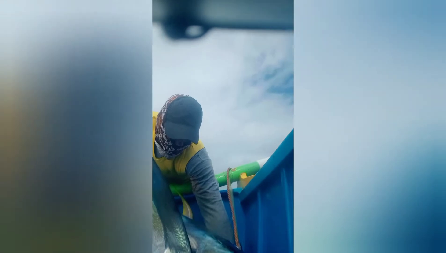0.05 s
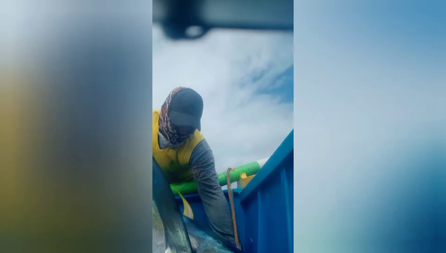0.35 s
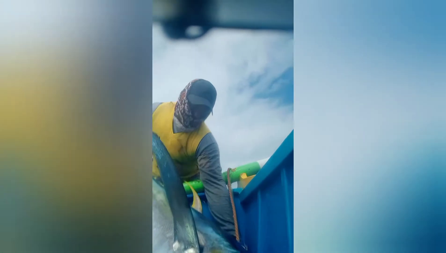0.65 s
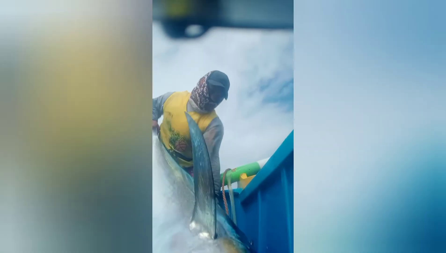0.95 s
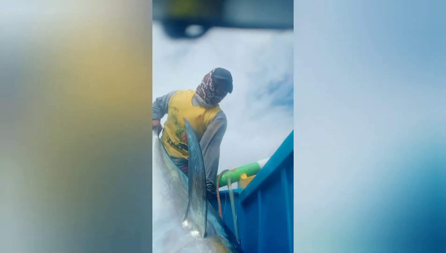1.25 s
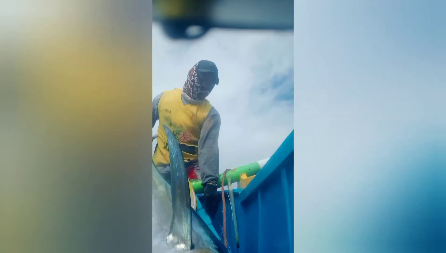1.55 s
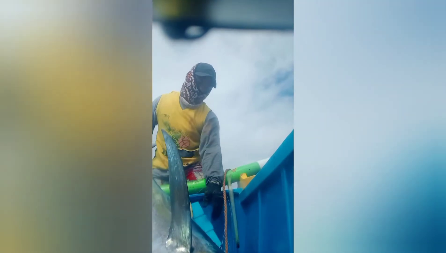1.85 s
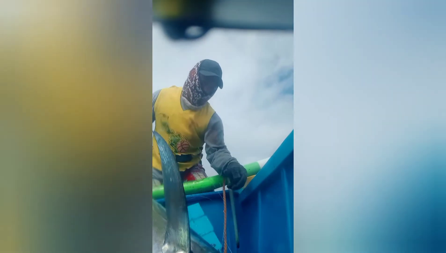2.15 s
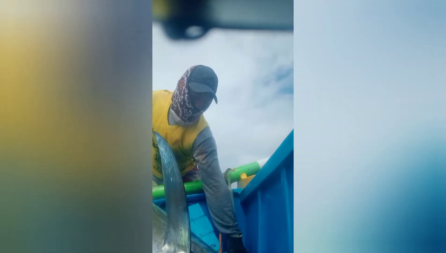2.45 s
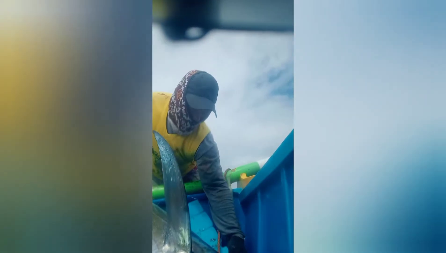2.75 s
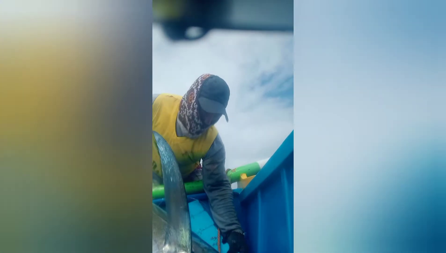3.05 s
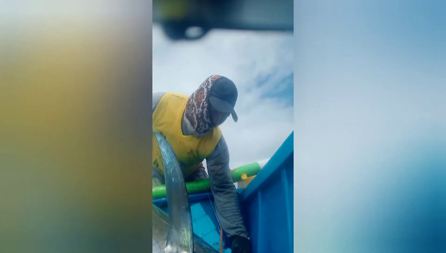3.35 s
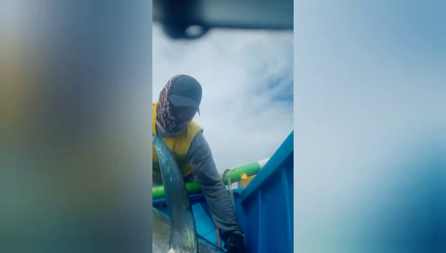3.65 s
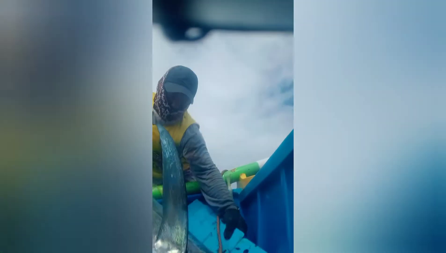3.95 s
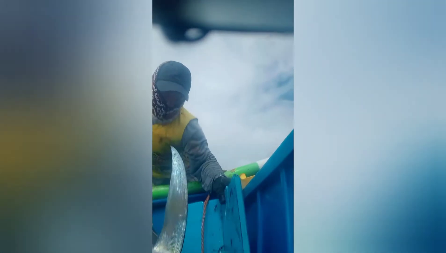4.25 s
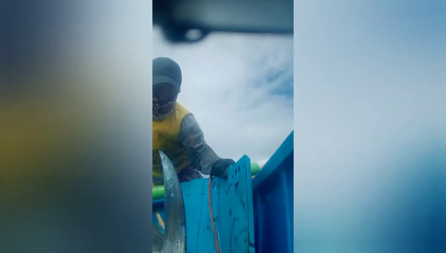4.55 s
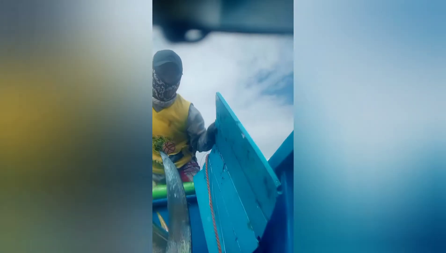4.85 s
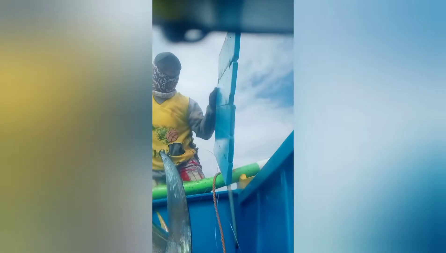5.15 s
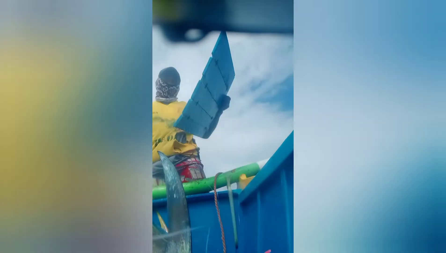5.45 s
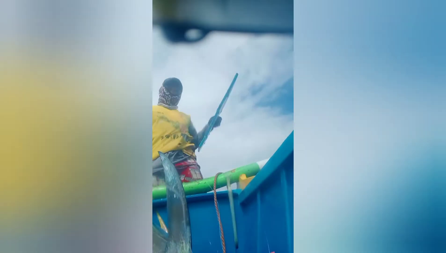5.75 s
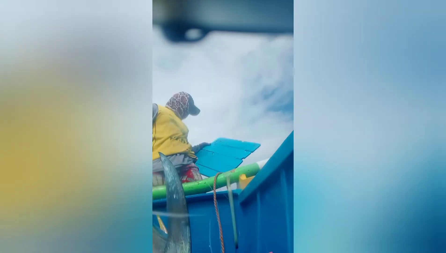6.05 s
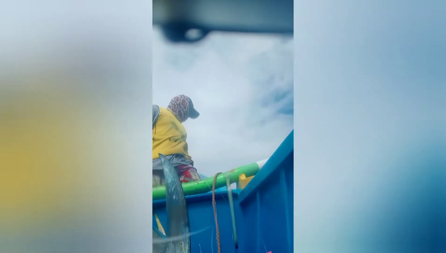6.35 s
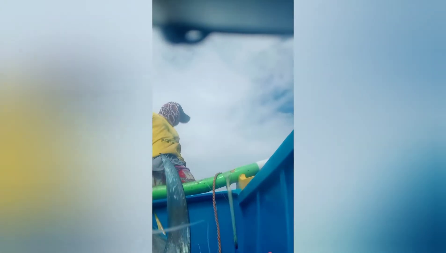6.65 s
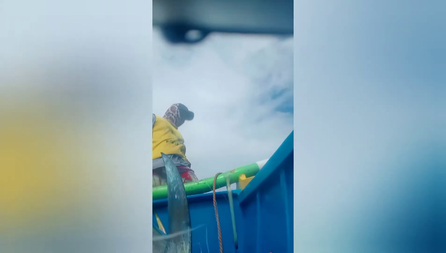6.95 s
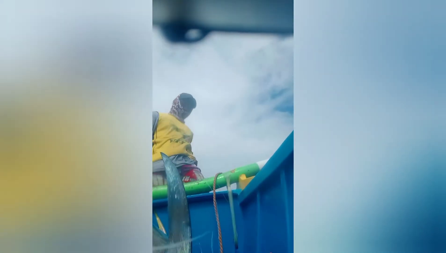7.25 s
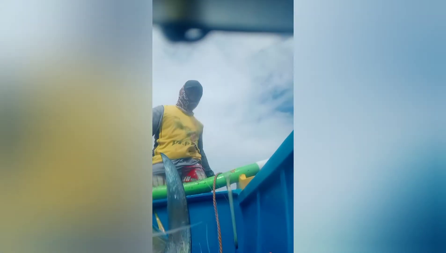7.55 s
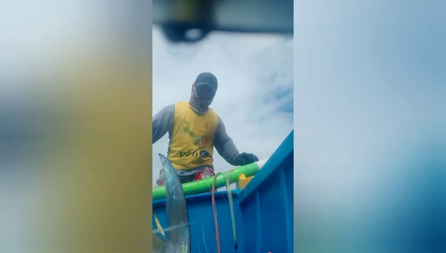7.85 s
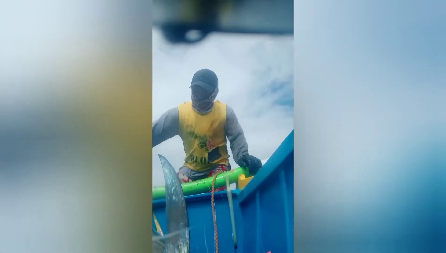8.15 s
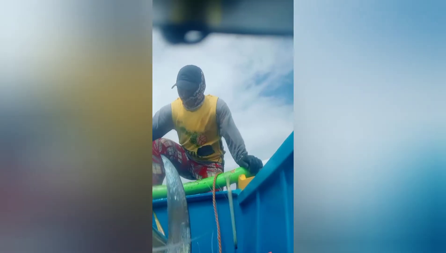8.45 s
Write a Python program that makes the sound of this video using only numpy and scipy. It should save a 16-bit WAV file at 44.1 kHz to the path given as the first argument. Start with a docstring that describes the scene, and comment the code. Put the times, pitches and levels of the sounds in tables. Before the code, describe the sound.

Close, dull thuds and wet slaps of a fish beating a boat hull, with wooden knocks, sloshing water and a dropped board.

```python
"""A big fish thrashes on the wet deck of a small boat, close to a camera microphone in a closed housing.
Its body and tail thump the hull, wet skin smacks, loose boards clack and a thin panel hums;
late on, a deck board drops and bounces. Underneath, water sloshes in surges, things scrape
over the deck, the hull rumbles and wind buffets the housing, which dulls the sound and rings faintly."""
import sys
import numpy as np
from scipy import signal
from scipy.fft import rfft, irfft
from scipy.io import wavfile
from scipy.ndimage import uniform_filter1d, minimum_filter1d

SR = 44100
rng = np.random.default_rng(int(sys.argv[2]) if len(sys.argv) > 2 else 0)


def inscribe(sig):
    """Save sig as 16-bit PCM at rate SR to the path in sys.argv[1].

    A 1-D sig is mono; a 2-D sig holds one channel per row.
    Samples are clipped to [-1, 1] before scaling.
    """
    pcm = np.round(np.clip(np.atleast_2d(sig).T, -1, 1) * 32767)
    wavfile.write(sys.argv[1], SR, pcm.astype(np.int16))


N = 374832
TIME = np.arange(N) / SR
AGE = np.arange(SR // 4) / SR  # seconds into one blow

# The fish hits the hull, close by. Each row: start in seconds, level in dB, centre of the tone in Hz,
# wet slap in dB relative to the blow.
FISH_THUMPS = [(0.523, -7.5, 342, -11.5), (0.634, -3, 146, -16.5), (0.725, -7.5, 136, -14.5),
               (0.863, -3.5, 264, -18), (0.92, -11.5, 334, -6), (1.017, -4, 157, -17),
               (1.096, -3.5, 153, -14.5), (1.261, -7, 229, -11), (1.296, -12.5, 260, -17),
               (1.454, -11, 150, -19), (2.068, -8.5, 193, -8.5), (2.126, -7.5, 190, -10.5),
               (2.455, -11.5, 147, -15), (2.752, -7.5, 290, -12), (2.778, -6.5, 101, -15),
               (2.81, -14, 140, -6.5), (3.195, -11, 300, -17), (3.742, -5, 127.5, -6.5),
               (3.8, -6.5, 133, -10.5), (3.832, -5, 140, -12.5), (4.047, -6.5, 160, -10),
               (4.131, 0.5, 179, -16.5), (4.153, -4, 195, -17), (4.194, -1, 174, -13.5),
               (4.249, 0.5, 231, -14), (4.331, -11, 170, -13), (4.562, -13, 223, -11.5),
               (4.733, -4, 145, -20.5), (6.217, -15, 226, -8)]
# Wet skin and boards smack. Each row: start in seconds, level in dB.
WET_SPLATS = [(0.523, -23), (0.595, -26.5), (0.714, -21.5), (0.911, -22.5), (0.964, -24.5), (1.037, -26),
              (4.048, -24), (4.153, -25.5), (5.075, -32.5), (5.581, -26.5), (6.082, -33), (7.635, -28),
              (8.343, -26.5)]
# Blows on a thin hollow panel. Each row: start in seconds, level in dB, centre of the tone in Hz.
PANEL_BLOWS = [(2.069, -7.5, 265), (2.126, -10.5, 265), (2.785, -13, 75)]
# Hard knocks on the deck boards. Each row: start in seconds, level in dB, centre of the tone in Hz.
DECK_KNOCKS = [(0.473, -11.5, 1010), (1.452, -12, 620), (1.885, -20, 1240), (1.909, -21.5, 1290),
               (1.974, -19, 1280), (2.021, -12, 720), (2.053, -13, 1100), (2.722, -21, 570),
               (2.944, -25.5, 500), (3.166, -17, 1150), (3.421, -16.5, 920), (3.445, -16.5, 1100),
               (3.476, -19.5, 1330), (3.489, -12.5, 1000), (3.542, -15.5, 1170), (3.551, -9, 880),
               (3.744, -12.5, 685), (3.8, -9.5, 660), (3.83, -13.5, 1200), (3.867, -12.5, 1560),
               (3.89, -9.5, 1460), (3.977, -24, 1510), (4.224, -17.5, 790), (4.903, -18, 1400),
               (4.918, -21, 1210), (4.983, -20, 1400), (4.998, -20, 1100), (5.145, -32, 1000),
               (6.245, -18, 830), (6.535, -14.5, 1100), (6.844, -19, 874), (6.955, -33.5, 1500),
               (7.622, -21, 710)]
# The loose board lands and bounces. Each row: start in seconds, level in dB, centre of the tone in Hz,
# slap in dB relative to the blow.
BOARD_LANDINGS = [(6.438, -4.5, 330, -11.5), (6.496, -9.5, 159, -7.5), (6.535, -3.5, 300, -8.5),
                  (6.626, -12.5, 141, -11.5), (6.655, -10, 346, -10.5), (6.842, -5.5, 345, -12.5)]
# Sharp snaps right by the housing. Each row: start in seconds, level in dB.
CLOSE_SNAPS = [(0.472, -10.5), (1.451, -23.5), (3.167, -24), (4.443, -25.5), (8.249, -36.5), (8.366, -25.5)]
# Water runs over the deck. Each row: crest in seconds, length in seconds, wash in dB, hull rumble in dB.
WATER_SURGES = [(0.293, 0.079, -29.5, -24.5), (0.556, 0.23, -32.5, -19.5), (0.9, 0.37, -28, -21),
                (1.53, 0.32, -31.5, -34), (2.791, 0.066, -28.5, -18), (3.96, 0.22, -31, -22),
                (4.55, 0.18, -30, -25.5), (5.61, 0.38, -37.5, -36), (6.25, 0.11, -31.5, -32.5),
                (7.74, 0.21, -33.5, -31), (8.04, 0.18, -37.5, -25.5), (8.336, 0.12, -41, -26.5)]
# The sea laps at the hull between surges. Each row: time in seconds, level in dB.
SEA_LAPPING = [(0, -37.5), (1.85, -40.5), (2.6, -45), (3.55, -36), (4.3, -50), (5.2, -41), (7.2, -45.5),
               (8.5, -34)]
# Things drag on the boards; gusts hit the housing. Each row: middle and length in seconds, level in dB.
DECK_SCRAPES = [(.28, .11, -34.5), (3.02, 0.034, -38), (3.13, 0.069, -39.5), (4.01, 0.036, -30),
                (4.53, .13, -33.5)]
WIND_GUSTS = [(5.42, 0.12, -25.5), (5.72, 0.44, -29)]
# Resonances of the boat's parts and the camera housing. Each row: frequency in Hz, level in dB.
HULL_MODES = [(79, -19.5), (118, 0.5), (143, 4.5), (167, 2), (200, 0), (266, -4), (335, 1.5), (400, -3.5),
              (510, -1.5)]
PANEL_MODES = [(81, -7.5), (130, -7), (203, -2), (702, -6)]
DECK_MODES = [(540, -10), (680, -11.5), (885, -7.5), (1010, -3.5), (1150, -6.5), (1320, -2.5), (1550, 1),
              (1750, -1), (1930, 6), (2330, 2.5)]
BOARD_MODES = [(122, 3.5), (186, 3), (240, 0.5), (290, 5.5), (339, 6.5), (395, 4.5), (655, -11.5)]
HOUSING_MODES = [(656, -10.5), (1000, -13), (1746, -4), (1880, -12), (2805, -3.5)]
# Tone colours of the contacts, the water and the hull. Each row: frequency in Hz, gain in dB.
SLAP_COLOUR = [(250, 9), (600, 9), (2000, -12.5), (3000, -19.5), (6000, -35), (15000, -83)]
SNAP_COLOUR = [(1000, 3), (2300, 9), (3700, -7), (6000, -25.5), (15000, -44.5)]
RASP_COLOUR = [(500, 8), (1900, 12.5), (3000, -2.5), (5000, -16.5)]
WASH_COLOUR = [(150, -11.5), (400, 9), (1000, -2), (2000, -16), (3000, -27.5), (4500, -30)]
RUMBLE_COLOUR = [(25, -43), (80, 4.5), (145, 11.5), (230, 3.5), (340, 8), (1000, -64)]

SLAP_CUT_HZ, SLAP_DB_PER_OCTAVE = 2630, 14  # a full slap reaches this high; softer flesh is duller
REBOUND_SLAP_DB = -5  # a second contact slaps less than the first
IDLE_RUMBLE_DB = -40.5  # the hull is never quite still
SHUDDER_DB, SHUDDER_S = -22.5, 0.05  # it shudders after each thump: level relative to the blow, decay
HOUSING_WIDTH_HZ, TOP_HZ = 20, 15700  # width of each housing resonance; upper edge of the treble


def thumps():
    """The fish beats body and tail on the hull near the microphone; the limp body flops down after."""
    return blows(FISH_THUMPS, HULL_MODES, contact_s=0.013, free_cycles=9.2,
                 rebound_s=0.022, rebound_db=-12.5)


def blows(rows, modes, contact_s, free_cycles, rebound_s, rebound_db):
    """A heavy flat blow booms its panel and the slap rings the planks; a softer contact follows."""
    out = np.zeros(N)
    for s, db, hz, slap_db in rows:
        cut_hz = SLAP_CUT_HZ * 2 ** (slap_db / SLAP_DB_PER_OCTAVE)
        rebound = (rebound_s * (1 + .1 * rng.standard_normal()), rebound_db, REBOUND_SLAP_DB)
        for delay_s, drop_db, slap_drop_db in (0, 0, 0), rebound:
            boom = ring(modes, hz, octaves=1.41, contact_s=contact_s, free_db=-6,
                        free_cycles=free_cycles, rise_s=0.00094, scatter_db=2.5, path_cycles=0.26)
            planks = ring(DECK_MODES, 640, octaves=0.45, contact_s=0.009, free_db=-14,
                          free_cycles=34, rise_s=0.0015, scatter_db=3, path_cycles=0.48)
            contact = crack(decay_s=0.012, tail_db=-25.5, tail_s=0.037, rise_s=0.0063)
            slap = undb(slap_db + slap_drop_db - 1.5) * muffle(planks + contact, cut_hz, order=2)
            add(out, s + delay_s, undb(db + drop_db) * (boom + slap))
    # small panels radiate little deep bass
    return signal.sosfilt(signal.butter(4, 72, "high", fs=SR, output="sos"), out)


def ring(modes, centre_hz, octaves, contact_s, free_db, free_cycles, rise_s, scatter_db, path_cycles):
    """Modes near the blow's own tone swing most; the contact damps them fast and a little rings on."""
    hz, db = np.transpose(modes)[:, :, None]
    detune, place, path = rng.standard_normal((3, len(hz), 1))
    hz = hz * (1 + .03 * detune)  # the shifting load moves the modes a little
    gain = undb(db + scatter_db * place) * nearness(hz, centre_hz, octaves)
    fade = np.exp(-AGE / contact_s) + undb(free_db) * np.exp(-AGE * hz / free_cycles)
    # each mode reaches the housing by its own path
    swing = np.cos(2 * np.pi * (hz * AGE + path_cycles * path))
    return unit_peak((gain * fade * swing).sum(axis=0) * rise(rise_s) ** 2)


def crack(decay_s, tail_db, tail_s, rise_s, direct_db=-12):
    """Rough contact that builds as the surfaces meet, coloured by the resonances of the deck."""
    contact = burst(decay_s, tail_db, tail_s) * rise(rise_s)
    wood = sum(undb(db) * resonate(contact, hz, q=16) for hz, db in DECK_MODES)
    return unit_peak(colour(wood + undb(direct_db) * contact, SLAP_COLOUR))


def burst(decay_s, tail_db, tail_s):
    """Many tiny contacts: noise that dies fast, then lingers faintly between the boat's sides."""
    fade = np.exp(-AGE / decay_s) + undb(tail_db) * np.exp(-AGE / tail_s)
    return rng.standard_normal(len(AGE)) * fade


def splats():
    """A wet smack starts at once and breaks up into a short spray of drops."""
    out = np.zeros(N)
    for s, db in WET_SPLATS:
        spray = burst(decay_s=0.013, tail_db=-7, tail_s=0.017) * undb(9 * wander(250)[:len(AGE)])
        add(out, s, undb(db) * unit_peak(muffle(colour(spray, RASP_COLOUR), 4020)))
    return out


def hums(octaves=0.93, decay_s=0.068):
    """A thin panel swings up under the blow and rings on with a hollow, wavering note."""
    out = np.zeros(N)
    hz, mode_db = np.transpose(PANEL_MODES)[:, :, None]
    for s, db, centre_hz in PANEL_BLOWS:
        waver_db = 2 * wander(60)[:len(hz) * len(AGE)].reshape(len(hz), -1)
        gain = undb(mode_db + waver_db) * nearness(hz, centre_hz, octaves)
        swing = (gain * np.sin(2 * np.pi * hz * AGE)).sum(axis=0)
        add(out, s, undb(db) * unit_peak(swing * np.exp(-AGE / decay_s) * rise(.004)))
    return out


def knocks():
    """Board edges clack: hollow wooden modes and a rough crack, dulled by the housing."""
    out = np.zeros(N)
    for s, db, hz in DECK_KNOCKS:
        wood = ring(DECK_MODES, hz, octaves=0.34, contact_s=0.0045, free_db=-18,
                    free_cycles=44, rise_s=0.00044, scatter_db=3.5, path_cycles=0.32)
        contact = crack(decay_s=0.008, tail_db=-17, tail_s=0.028, rise_s=.0015)
        grit = unit_peak(resonate(contact, hz, q=.5))
        add(out, s, undb(db) * (muffle(wood, 3100) + undb(-1.5) * grit))
    return out


def landings():
    """The loose board falls and clatters with a hollow note, its far edge just after the near one."""
    return blows(BOARD_LANDINGS, BOARD_MODES, contact_s=0.011, free_cycles=12.5,
                 rebound_s=0.019, rebound_db=-0.5)


def snaps():
    """Hard bright contacts right by the housing die almost at once."""
    out = np.zeros(N)
    for s, db in CLOSE_SNAPS:
        contact = burst(decay_s=0.0065, tail_db=-19.5, tail_s=0.033) * rise(0.00078)
        add(out, s, undb(db) * unit_peak(colour(contact, SNAP_COLOUR)))
    return out


def slosh():
    """Water on the deck: a soft wash with splatters and bubbles, over the rumble of the hull."""
    drops = rng.standard_normal(N)
    drops *= signal.fftconvolve(clicks(per_s=90, spread_db=3), np.exp(-AGE / .008))[:N]
    water = rng.standard_normal(N) + .5 * unit_rms(drops)
    # as the water shifts it wakes now one plank, now another
    gurgle = sum(undb(db + 4.5 * wander(25)) * resonate(water, hz, q=5) for hz, db in DECK_MODES)
    wash = unit_rms(muffle(colour(gurgle + .5 * water, WASH_COLOUR), 4300, order=5))
    rumble = unit_rms(colour(rng.standard_normal(N), RUMBLE_COLOUR))
    wash_gain, rumble_gain = flow()
    bubbling_wash = wash * undb(wander(24)) + bubbles()
    return bubbling_wash * wash_gain + rumble * undb(2 * wander(22)) * rumble_gain


def flow():
    """Gains of the wash and of the rumble: surges drive both, and thumps leave the hull shuddering."""
    wash_power = undb(np.interp(TIME, *np.transpose(SEA_LAPPING))) ** 2
    rumble_power = undb(IDLE_RUMBLE_DB) ** 2
    for s, length, wash_db, rumble_db in WATER_SURGES:
        gain = surge(s, length)
        wash_power += (undb(wash_db) * gain) ** 2
        rumble_power += (undb(rumble_db) * gain) ** 2
    jolts = np.zeros(N)
    for s, db, _, _ in FISH_THUMPS:
        add(jolts, s, [undb(db + SHUDDER_DB) ** 2])
    shudder_power = signal.lfilter([1], [1, -np.exp(-2 / (SHUDDER_S * SR))], jolts)
    return np.sqrt(wash_power), uniform_filter1d(np.sqrt(rumble_power + shudder_power), size=600)


def surge(crest_s, length_s, build_share=0.67, drain_share=0.61, roundness=2.05):
    """Gain of one surge: the water builds to a round crest and drains away."""
    width_s = length_s * np.where(TIME < crest_s, build_share, drain_share)
    return np.exp(-np.minimum(np.abs((TIME - crest_s) / width_s) ** roundness, 30))


def bubbles(per_s=29, re_wash_db=-9, low_hz=450, high_hz=2000, decay_cycles=7):
    """Air pockets in the running water ring for a few cycles and rise in pitch as they burst."""
    out = np.zeros(N)
    for when, pitch, size in rng.random((int(per_s * N / SR), 3)):
        cycles = AGE[:len(AGE) // 3] * low_hz * (high_hz / low_hz) ** pitch
        chirp = np.sin(2 * np.pi * cycles * (1 + 0.0032 * cycles))
        envelope = np.exp(-cycles / decay_cycles) * (1 - np.exp(-cycles)) ** 2
        add(out, when * N / SR, size ** 2 * chirp * envelope)
    return undb(re_wash_db) * unit_rms(out)


def scrapes():
    """Edges dragged over the deck stick and slip in a dense, gritty rasp."""
    slips = clicks(per_s=980, spread_db=0.5)
    grain = np.exp(-AGE / 0.0047) * rng.standard_normal(len(AGE))
    rasp = colour(signal.fftconvolve(slips, grain)[:N], RASP_COLOUR)
    return unit_rms(muffle(rasp, 4200)) * swells(DECK_SCRAPES)


def wind(hz=85):
    """Air flutters low against the housing."""
    air = resonate(resonate(rng.standard_normal(N), hz, q=1), hz, q=1)
    return muffle(unit_rms(air) * swells(WIND_GUSTS), 290)


def swells(rows):
    """Gain that rises and falls in one arch for each row."""
    return sum(undb(db) * np.sqrt(np.maximum(1 - (2 * (TIME - middle_s) / length_s) ** 2, 0))
               for middle_s, length_s, db in rows)


def clicks(per_s, spread_db):
    """Random clicks, most small and a few larger."""
    sizes = undb(spread_db * np.minimum(rng.exponential(size=N), 4)) * rng.choice([-1, 1], N)
    return sizes * (rng.random(N) < per_s / SR)


def wander(per_s):
    """Random steps smoothed twice, with a spread of 1."""
    hold = int(SR / per_s)
    steps = np.repeat(rng.standard_normal(N // hold + 1), hold)
    return unit_rms(uniform_filter1d(uniform_filter1d(steps, hold), hold)[:N])


def colour(x, points, size=4096):
    """Minimum-phase filter with the given (Hz, dB) outline."""
    hz, db = np.transpose(points)
    bin_hz = np.maximum(np.fft.rfftfreq(size, 1 / SR), 1)
    gain = undb(np.interp(np.log(bin_hz), np.log(hz), db))
    cepstrum = irfft(np.log(gain))
    cepstrum[1:size // 2] *= 2
    cepstrum[size // 2 + 1:] = 0
    return signal.fftconvolve(x, irfft(np.exp(rfft(cepstrum))))[:len(x)]


def resonate(x, hz, q):
    """One resonance, gain 1 at its centre."""
    return signal.lfilter(*signal.iirpeak(hz, q, fs=SR), x)


def muffle(x, hz, order=4):
    """Loss of treble above hz."""
    return signal.sosfilt(signal.butter(order, min(hz, TOP_HZ), fs=SR, output="sos"), x)


def nearness(hz, centre_hz, octaves):
    """Bell-shaped weight over pitch, 1 at the centre."""
    return np.exp(-(np.log2(hz / centre_hz) / octaves) ** 2 / 2)


def rise(rise_s):
    """Onset of a blow, from 0 towards 1."""
    return 1 - np.exp(-AGE / rise_s)


def unit_peak(x):
    """Fade a blow out and scale it so that its loudest few milliseconds swing about +-1."""
    peak = np.sqrt(2 * uniform_filter1d(x ** 2, size=260).max())
    return x * np.cos(np.pi / 2 * AGE / AGE[-1]) / peak


def unit_rms(x):
    return x / np.std(x)


def undb(db):
    return 10 ** (np.asarray(db) / 20)


def add(out, s, sound):
    """Mix a sound in at s seconds."""
    start = int(s * SR)
    out[start:start + len(sound)] += sound[:N - start]


def scene():
    """The deck from close up, in mono: fish and boards over water, wind and a faint hiss."""
    hiss = undb(-88.5) * rng.standard_normal(N)
    impacts = thumps() + knocks() + snaps() + splats() + landings()
    return (impacts + slosh() + scrapes() + hums() + wind() + hiss)[None]


def record(dry, ceiling=.92):
    """At the microphone: the housing rings faintly, a limiter holds the heaviest blows, the top is cut."""
    housing = sum(undb(db) * resonate(dry, hz, q=hz / HOUSING_WIDTH_HZ) for hz, db in HOUSING_MODES)
    inside = dry + housing
    safe_gain = np.minimum(1, ceiling / (np.abs(inside) + 1e-9))
    held_gain = minimum_filter1d(safe_gain, size=400)
    gain = uniform_filter1d(uniform_filter1d(held_gain, size=200), size=200)
    return signal.sosfilt(signal.ellip(8, .2, 70, TOP_HZ, fs=SR, output="sos"), inside * gain)


dry = scene()
out = record(dry)
inscribe(out)
```